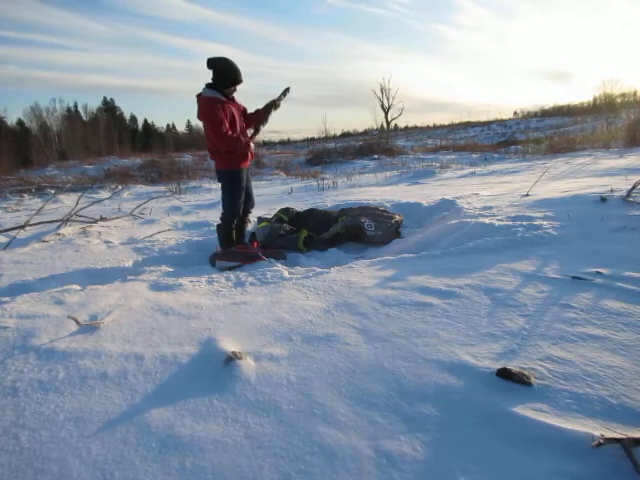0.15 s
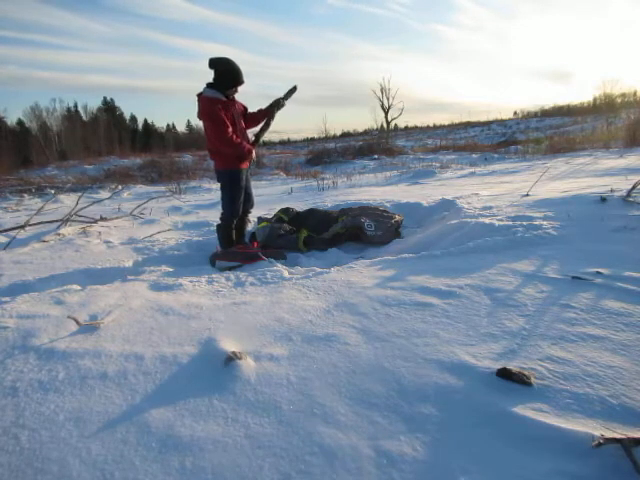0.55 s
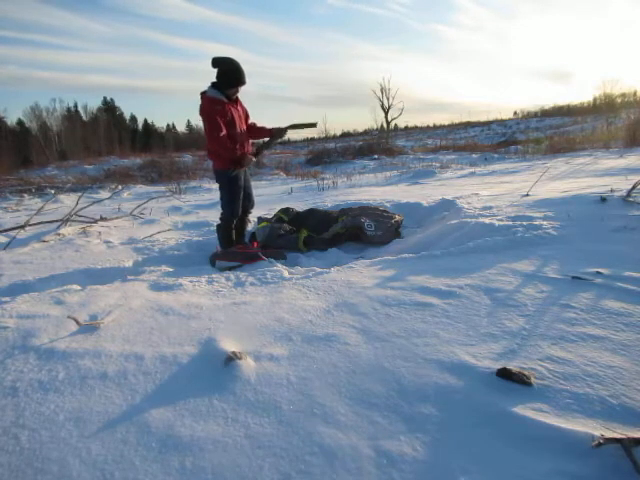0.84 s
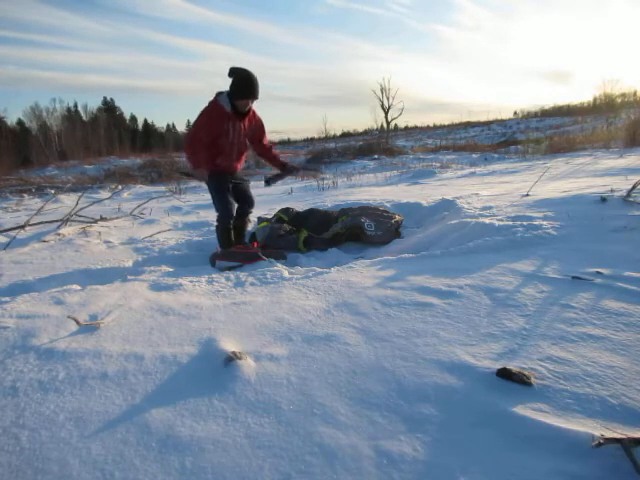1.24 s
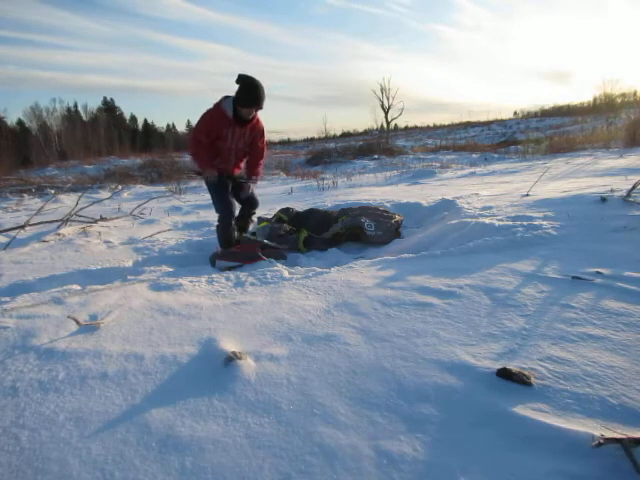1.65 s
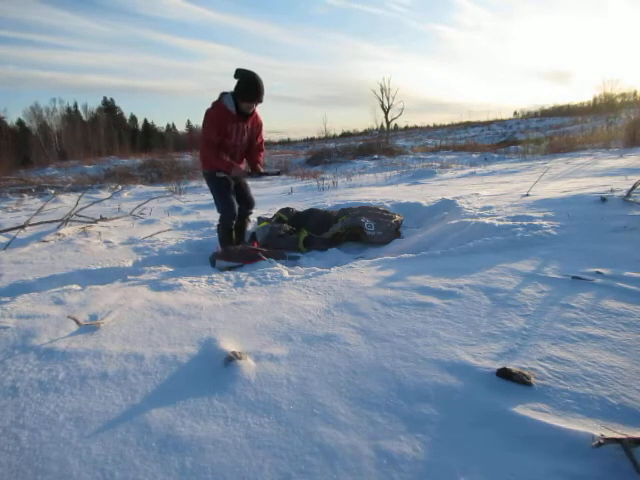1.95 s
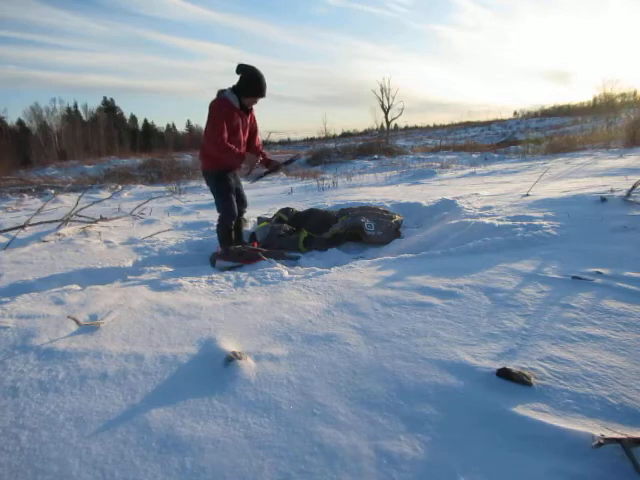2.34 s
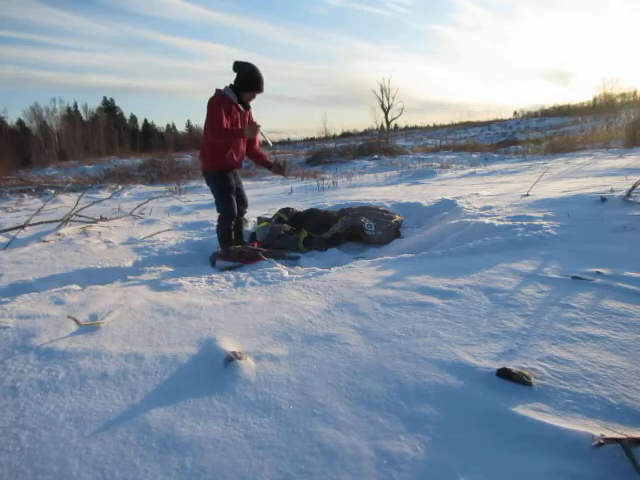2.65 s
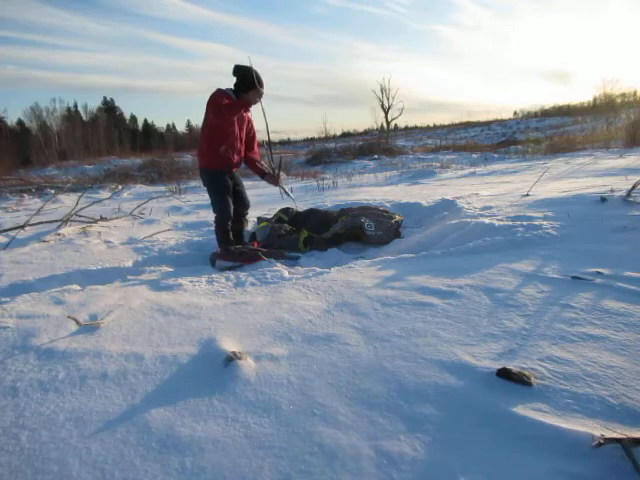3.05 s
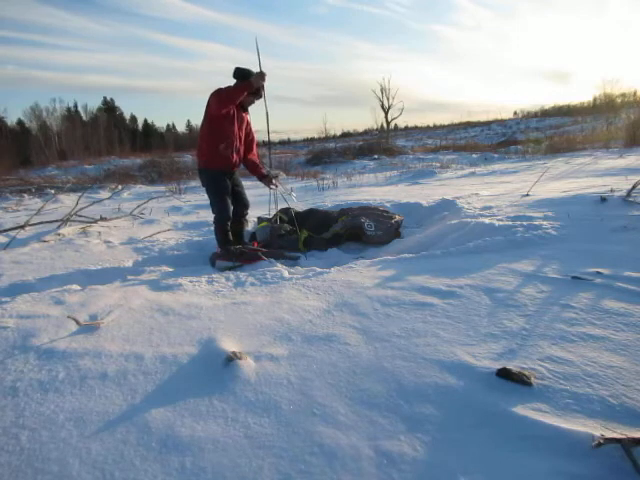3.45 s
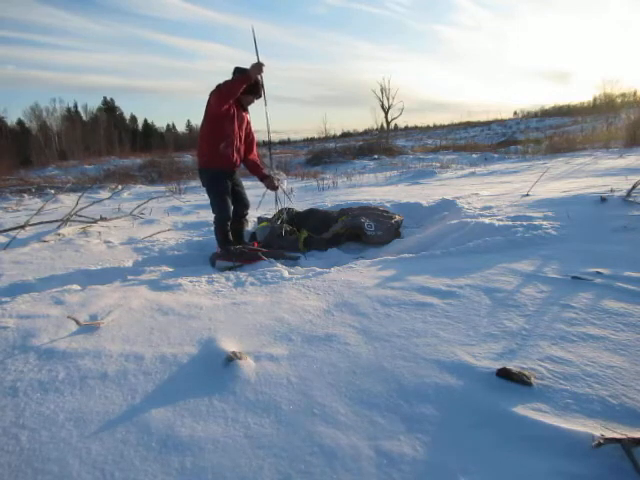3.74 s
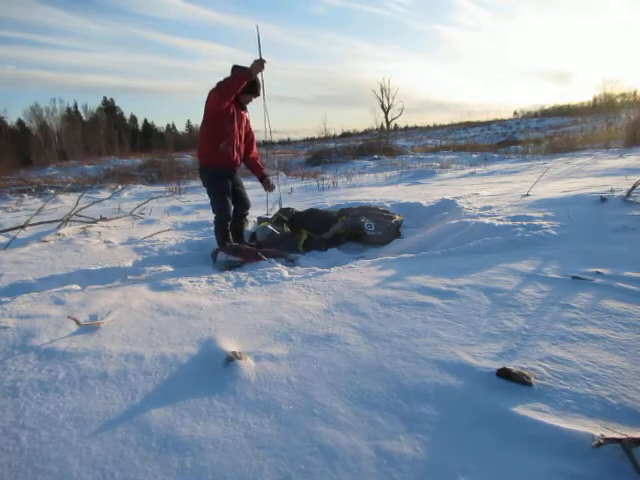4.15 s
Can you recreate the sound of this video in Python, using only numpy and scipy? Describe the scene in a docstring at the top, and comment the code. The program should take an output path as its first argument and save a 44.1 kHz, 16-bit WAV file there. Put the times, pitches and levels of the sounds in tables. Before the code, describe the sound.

A dry, close-detailed handling sound in an open snowfield, with no echo, over soft steady microphone hiss and a very faint wavering far drone. From 0 to 0.8 s thin aluminium tubes chatter in bright, short clinks with a dense cluster around 0.3 s, duller woody-metal knocks around 0.55 s, and nylon rustle; a gritty scrape climbs in pitch up to 0.75 s as the bundle leaves the bag, then stops abruptly. About 0.85 to 1.3 s is nearly quiet. Soft bumps and cloth near 1.5 s lead to a quick rattle at 1.65-1.72 s, and a single clink at 1.9 s. A crisp click lands at 2.15 s, with light ticks and glove rubbing until 2.6 s. A strong bright clatter bursts at 2.95-3.07 s. Clinks at 3.4 and 3.6 s precede low hollow knocks from 3.7 s and the loudest, very sharp snap at 3.8 s. Small ticks and rustle fade out afterwards.

```python
"""Tent poles on open snow

An open snowfield without echo, some metres from a camera: aluminium pole sections slide out of a nylon bag.
Thin tubes chatter in bright, short clinks (damped wall modes); some blows bend a section (lower modes).
Nylon and gloves rustle as shaped noise and tiny slips; the bag's hollow rings upward as the bundle leaves.
Soft bumps are low damped sines; filtered noise makes the camera's own hiss and a faint far drone."""
import sys
import numpy as np
from scipy import signal
from scipy.fft import rfft, irfft, next_fast_len
from scipy.io import wavfile
from scipy.ndimage import uniform_filter1d, minimum_filter1d, map_coordinates

SR = 44100
rng = np.random.default_rng(int(sys.argv[2]) if len(sys.argv) > 2 else 0)


def unload_wav(signal):
    """Save mono or channel-first audio to the path in sys.argv[1] as 16-bit WAV at rate SR, clipped to [-1, 1]."""
    wavfile.write(
        sys.argv[1],
        SR,
        np.round(np.clip(np.atleast_2d(signal).T, -1, 1) * 32767).astype(np.int16),
    )


N = 190159
T = np.arange(N) / SR  # s

# spectrum of the camera hiss: [f/Hz, relative density/dB]
HISS_SPECTRUM = [(15, -27), (45, 0), (495, -1.5), (684, 0.5), (848, -2.5), (945, -0.5), (2300, -9),
                 (3000, -7), (4040, -10), (10600, -14), (15500, -26)]
# noise bands of the far drone: [f/Hz, width/Hz, relative level/dB]
DRONE_BANDS = [(146, 78, 5.5), (756, 80, -5), (964, 36, 12), (1874, 380, 3.5), (2910, 27, -1)]
# soft low bumps: [t/s, level before the soft start/dB, f/Hz]
SOFT_BUMPS = [(1.488, -38, 165), (1.542, -34, 189), (2.115, -37.5, 160), (2.426, -35.5, 165),
              (2.702, -38, 151), (2.777, -42.5, 162), (2.946, -31, 127), (3.037, -42, 149),
              (3.694, -34, 220), (3.778, -28.5, 135), (3.869, -40, 129)]
# spectra of bag cloth, of tubes through a glove, of sleeves: [f/Hz, relative density/dB]
SCRAPE_SPECTRUM = [(100, -60), (300, -1.5), (900, -3.5), (1900, 0.5), (2800, -6), (5000, -33), (16000, -17)]
SLIDE_SPECTRUM = [(1200, -24.5), (2300, -4), (3300, -2.5), (4800, -7), (7000, -12.5), (16000, -21.5)]
FIZZ_SPECTRUM = [(2000, -78), (4500, -5.5), (6500, 2.5), (9000, -0.5), (12000, -1), (16000, -8.5)]
# movements of hands and bag:
# [peak t/s, swell/s, fade/s, bag scrape level/dB, tube slide level/dB, sleeve fizz level/dB]
MOVEMENTS = [(0.0, .05, .15, -45.5, -48, -51), (.118, 0.071, 0.067, -46.5, -51.5, -52.5),
             (.297, 0.026, .06, -41.5, -45, -35), (.385, 0.095, .25, -54, -54.5, -54),
             (.55, .15, 0.26, -46, -56.5, -51), (.75, .2, .05, -39, -40, -42),
             (.805, .06, .06, -41, -41, -42.5), (1.34, 0.28, 0.21, -63, -60.5, -67),
             (1.557, .06, 0.065, -44, -51, -55), (1.68, .06, 0.13, -51, -48.5, -42),
             (1.83, .2, .06, -64, -52.5, -50), (2.15, .05, 0.026, -64, -54.5, -46.5),
             (2.39, .04, 0.03, -78, -44, -44), (2.448, .03, .08, -67, -47, -56),
             (2.54, .09, 0.059, -67, -47, -49.5), (2.861, .25, 0.22, -79, -46.5, -53),
             (2.975, .04, .04, -51, -37.5, -29.5), (3.03, .06, 0.11, -72, -53, -50),
             (3.43, 0.054, .2, -70, -55.5, -50), (3.586, 0.095, 0.24, -81, -47.5, -64),
             (3.77, .1, .06, -51, -47, -48), (3.82, .03, .15, -50, -45.5, -44),
             (3.995, .08, 0.053, -47, -49.5, -43), (4.117, 0.18, 0.095, -51.5, -56.5, -55.5),
             (4.31, .4, 0.053, -60.5, -61.5, -78)]
# cloth between movements: [scrape level/dB, slide level/dB, fizz level/dB]
IDLE_LEVELS = [-68, -66, -64.5]
# the bundle is drawn out of the bag: [peak t/s, swell/s, fade/s, level/dB]
BAG_PULLS = [(.755, 0.19, 0.034, -38)]
# blows that bend a section: [t/s, level/dB, high over low modes/dB, middle modes over both ends/dB]
BENDING_BLOWS = [(.016, -31.5, 28, -2), (.293, -28, 26, 6), (0.453, -34.5, 4, 10), (0.536, -22, 4, 11),
                 (0.574, -29, 14, 8), (.587, -29, 26, 10), (0.639, -37, 21, 5), (0.674, -30, 28, 9),
                 (.738, -30, 35, 0), (1.052, -38.5, 15, -14), (1.294, -38.5, 16, 9), (1.352, -40, 4, 8),
                 (1.491, -27, 3, 3), (1.498, -28.5, -4, 7), (1.54, -35.5, -15, -1), (1.627, -35, 41, 3),
                 (2.948, -26.5, -15, 4), (3.4, -33.5, 9, 10), (3.699, -19.5, -5, -2), (3.757, -25, -21, 0),
                 (3.765, -19, -1, 17.5), (3.786, -29, -9, -3), (3.825, -36, 0, 10), (3.871, -32.5, -10, 18),
                 (3.992, -32.5, -8, 11), (4.064, -35, -14, 14), (4.104, -36, -5, 13)]
# bending modes of a section, nominal: [f/Hz, level/dB, t60/s]
BENDING_MODES = [(420, -3, 0.019), (691, -3.5, 0.012), (887, -7, 0.033), (1230, 2.5, 0.0032),
                 (1630, 1, 0.019), (2054, 4.5, 0.012), (2490, 15, 0.0036), (2780, 14.5, 0.0027)]
# clear clinks, tube on tube: [t/s, level/dB, high over low wall modes/dB, chatter t60/s]
TUBE_CLINKS = [(0.013, -32, -3, 0.011), (0.0367, -24, -18, 0.026), (.0803, -35.5, -31, .013),
               (0.1108, -31, -14, 0.051), (0.1314, -36, -30, .016), (0.283, -32, -2, .05),
               (0.2943, -25.5, -11, 0.049), (0.2993, -17.5, 0, 0.018), (.3197, -25.5, -5, 0.015),
               (.3265, -28, -5, .02), (0.341, -35, 1, 0.031), (0.3505, -35, -23, .032),
               (0.3697, -31.5, -11, 0.03), (.3793, -29, -6, 0.023), (.3887, -34, -10, 0.021),
               (.498, -29, -8, 0.0081), (.5445, -27, -4, 0.011), (.5874, -33.5, -25, 0.0057),
               (0.6418, -30, -3, .004), (.7093, -33, 11, .046), (.724, -30, 2, .011),
               (0.753, -22.5, -20, 0.0036), (.7628, -21, -34, .007), (.801, -30, -1, 0.022),
               (1.3413, -38, 3, .009), (1.492, -38, -33, 0.0059), (1.5416, -34.5, -25, .015),
               (1.646, -24.5, -7, 0.057), (1.654, -23, -6, 0.033), (1.666, -26, -25, .008),
               (1.6771, -30, 12, .01), (1.6812, -20.5, -34, 0.0089), (1.6969, -25, -9, 0.012),
               (1.705, -25.5, 14, 0.018), (1.7193, -24.5, -8, 0.013), (1.839, -39, -5, 0.035),
               (1.8968, -25.5, -11.5, 0.03), (2.1479, -16, 3, 0.012), (2.1646, -29.5, -10, 0.013),
               (2.194, -43, -1, .03), (2.28, -42.5, -24, 0.068), (2.3671, -29.5, -14, 0.036),
               (2.3857, -44, -15, 0.091), (2.4122, -41, -3, .03), (2.4363, -34.5, -2, .05),
               (2.448, -37, -17, 0.031), (2.469, -42, -5, .02), (2.4771, -40, -20, .035),
               (2.5435, -29, -12, 0.021), (2.5562, -29, -17, 0.016), (2.8102, -37, -16, 0.043),
               (2.849, -31, -27, 0.047), (2.8634, -31, -20, 0.064), (2.8916, -33, -11, 0.052),
               (2.909, -19, 2, .024), (2.9493, -33, 3, .05), (2.9596, -12, -6, 0.025),
               (2.9655, -15, 0, 0.057), (2.9775, -13.5, 22, .013), (2.9809, -4.5, 18, .025),
               (3.0208, -23, -1, 0.034), (3.0383, -25, -5, 0.0077), (3.0545, -15, 0, 0.032),
               (3.0674, -24, 10, .009), (3.084, -31.5, -5, .021), (3.1017, -37, 7, 0.035),
               (3.3255, -40.5, -25, 0.098), (3.4007, -23.5, -19, 0.077), (3.4052, -18, -9, 0.031),
               (3.482, -38, -24, 0.036), (3.495, -27.5, -34, 0.0088), (3.528, -42, -43, .03),
               (3.5696, -23.5, -27, 0.046), (3.587, -36, -28, .012), (3.5936, -28.5, -54, 0.011),
               (3.628, -30, -13, 0.06), (3.6664, -29, -14, 0.045), (3.7, -34.5, -27, 0.094),
               (3.739, -28, -36, .009), (3.7649, -28.5, -30, 0.074), (3.7969, 14, 37, 0.0083),
               (3.7982, -3, 33.5, 0.025), (3.8141, -41, 0.5, 0.035), (3.8242, -24, -7, .041),
               (3.8444, -36, 7, .04), (3.879, -37, -32, 0.022), (3.894, -43, 10, .035),
               (3.972, -29, -10, 0.092), (3.984, -25, 9, 0.054), (4.0353, -28, -26, .026),
               (4.118, -37, -20, 0.056), (4.173, -52, -24, .018)]
# wall modes of a tube damped by hands and cord, nominal: [f/Hz, level/dB, t60/s]
WALL_MODES = [(3010, -22.5, 0.016), (3580, -20, 0.031), (4590, -2.5, 0.0031), (4960, -5, 0.0087),
              (5660, -0.5, 0.0024), (6480, -7, 0.01), (7260, -2, 0.0023), (7560, -15, 0.0026),
              (8320, 9, 0.0018), (9350, 5, 0.0042), (9830, 6.5, 0.0033), (11020, 10, 0.0019),
              (11600, -11, 0.0021), (12000, -1, 0.0094), (14300, 3, 0.0016), (14100, -8, 0.0035),
              (14950, -21, 0.0019), (17300, -4.5, 0.0025)]

HISS_DB, DRONE_DB, DRONE_WAVER_DB = -56.5, -63.5, 2.5
BUMP_T60 = 0.034  # s
SPAN_DB = 20  # swell and fade are the times for this change of level
JOLT_SWELL_S, JOLT_FADE_S = 0.006, 0.02  # a blow shakes loose a brief rustle
KNOCK_JOLT_DB = -22  # scrape, relative to the knock
CLINK_JOLT_DB = (-28.5, -22.5)  # slide and fizz, relative to the clink
JOLT_TOP_DB = -8.5  # no clink shakes harder than one of this level
HOLLOW_HZ, HOLLOW_RISE, HOLLOW_WIDTH = 3100, 9.8, 0.4  # pitch at the peak; octaves per s; octaves
KNOCK_T60 = 0.021  # chatter of a knock, s
WALL_SPOT_DB, BENDING_SPOT_DB = 3, 2  # random spread of mode strengths with the spot hit
WALL_ENDS_DB = -5.5  # lowest and highest wall modes relative to the middle ones
TICK_COUNT, TICK_DB, TICK_SCATTER_DB = 40, -44, 5.5
TICK_BRIGHT_DB, TICK_BRIGHT_SCATTER_DB, TICK_T60 = -20, 15, 0.012  # t60 in s
SHELF_HZ, TOP_HZ = 15150, 16381


def amp(db):
    """Gain of a level in dB."""
    return 10 ** (np.asarray(db) / 20)


def unit(x):
    """x at rms 1."""
    return x / np.sqrt(np.mean(x ** 2) + 1e-20)


def along(points, hz):
    """Values at hz, interpolated between (Hz, value) points on a log axis."""
    f, value = np.transpose(points)
    return np.interp(np.log(hz + 1), np.log(f + 1), value)


def filtered(x, response):
    """x with its spectrum multiplied by a response of frequency."""
    length = next_fast_len(N + SR // 4)
    hz = np.fft.rfftfreq(length, 1 / SR)
    return irfft(rfft(x, length) * response(hz), length)[:N]


def wobble(rate):
    """A smooth random curve with rate knots a second."""
    knots = rng.standard_normal(int(N * rate / SR) + 4)
    return map_coordinates(knots, [T * rate])


def add(track, s, sound):
    """Lays a sound on the track at s seconds."""
    part = track[max(round(s * SR), 0):][:len(sound)]
    part += sound[:len(part)]


def swells(rows):
    """Power over time of (peak s, swell s, fade s, dB, ..) rows, one curve for each level column."""
    s, swell, fade, *levels = np.transpose(rows)[:, :, None]
    t = T[::32]  # a coarse time grid is enough
    shape = amp(-2 * SPAN_DB * np.maximum((s - t) / swell, (t - s) / fade))
    curves = [np.sum(amp(2 * level) * shape, axis=0) for level in levels]
    return np.array([np.interp(T, t, curve) for curve in curves])


def thin(x, hz):
    """A thin tube cannot move air below its lowest mode: a steep high-pass."""
    return signal.sosfilt(signal.butter(4, hz, "high", fs=SR, output="sos"), x)


def stillness():
    """Camera hiss and air, with a faint far drone of narrow, wavering noise bands."""
    def drone_response(f):
        return sum(amp(db) * 1j * f * width / (centre * centre - f * f + 1j * f * width)
                   for centre, width, db in DRONE_BANDS)

    hiss = filtered(rng.standard_normal(N), lambda hz: amp(along(HISS_SPECTRUM, hz)))
    drone = filtered(rng.standard_normal(N), drone_response)
    drone_level = amp(DRONE_DB + DRONE_WAVER_DB * wobble(4.96))
    return amp(HISS_DB) * unit(hiss) + drone_level * unit(drone)


def bumps():
    """Each bump is one low, damped swing with a soft start."""
    out = np.zeros(N)
    t = np.arange(SR // 6) / SR
    soft_start = 1 - np.exp(-t / 0.0026)
    for s, db, hz in SOFT_BUMPS:
        decay = amp(db - 60 * t / BUMP_T60)
        add(out, s, decay * soft_start * np.sin(2 * np.pi * hz * t))
    return out


def rubbing(spectrum, slips, lumpy_db, smooth):
    """Cloth slips in tiny uneven jerks (slips a second) that come in clumps, over a smooth share of noise."""
    size = amp(6.6 * rng.uniform(-1.23, 1, N)) * np.sign(rng.standard_normal(N))
    jerks = size * (rng.random(N) < slips / SR)
    friction = unit(jerks) + smooth * rng.standard_normal(N)
    clumps = amp(lumpy_db * (wobble(35) + wobble(140)))
    return unit(filtered(friction * clumps, lambda hz: amp(along(spectrum, hz))))


def rustle():
    """One uneven rubbing for each material, driven by movements and jolted by knocks and the louder clinks."""
    knock_jolts = [(s, JOLT_SWELL_S, JOLT_FADE_S, db + KNOCK_JOLT_DB) for s, db, *_ in BENDING_BLOWS]
    clink_jolts = [(s, JOLT_SWELL_S, JOLT_FADE_S, *(min(db, JOLT_TOP_DB) + np.array(CLINK_JOLT_DB)))
                   for s, db, *_ in TUBE_CLINKS if db > -30]
    power = swells(MOVEMENTS) + amp(2 * np.array(IDLE_LEVELS))[:, None]
    power[:1] += swells(knock_jolts)  # scrape
    power[1:] += swells(clink_jolts)  # slide and fizz
    scrape, slide, fizz = np.sqrt(power)
    return (scrape * rubbing(SCRAPE_SPECTRUM, slips=2500, lumpy_db=2.2, smooth=0.26)
            + slide * rubbing(SLIDE_SPECTRUM, slips=3000, lumpy_db=1.98, smooth=0.77)
            + fizz * rubbing(FIZZ_SPECTRUM, slips=3000, lumpy_db=2.0, smooth=0.65))


def pull():
    """A gritty scrape rings in the hollow of the bag, whose pitch climbs as the tubes leave."""
    scrape = rubbing(SCRAPE_SPECTRUM, slips=1300, lumpy_db=1.4, smooth=0.45)
    hz, t, spectra = signal.stft(scrape, SR, nperseg=256)
    # the pitch, in octaves, climbs during the last 0.15 s before the peak
    centre = np.log2(HOLLOW_HZ) + HOLLOW_RISE * np.clip(t - BAG_PULLS[0][0], -0.15, 0)
    distance = (np.log2(hz + 1)[:, None] - centre) / HOLLOW_WIDTH
    ring = 1 / np.sqrt(1 + distance ** 4)
    hollow = signal.istft(spectra * ring, SR, nperseg=256)[1][:N]
    return np.sqrt(swells(BAG_PULLS)[0]) * unit(hollow)


def blow(modes, colour_db, t60, spot_db, contacts, swell, first):
    """Tiny contacts swell and die away, ringing modes whose strength and pitch vary with each blow."""
    t = np.arange(SR // 12) / SR
    hz, db, ring = np.transpose(modes)[:, :, None]
    strength, detune = rng.standard_normal((2, len(modes), 1))
    decay = amp(db + colour_db[:, None] + spot_db * strength - 60 * t / ring)
    decay[::2] *= -1  # neighbouring modes start in opposite directions
    tone = np.sum(decay * np.sin(2 * np.pi * hz * (1 + 0.029 * detune) * t), axis=0)
    taps = rng.standard_normal(len(t)) * (rng.random(len(t)) < contacts / SR)  # contacts a second
    taps *= amp(-60 * t / t60) * (1 - np.exp(-t / (swell * t60)))
    taps[0] = first  # the blow itself, before the chatter
    sound = signal.fftconvolve(taps, tone)[:len(t)]
    loudest = np.sqrt(uniform_filter1d(sound ** 2, size=66).max())
    return sound / (2 * loudest)  # peaks near 1


def knocks():
    """A blow bends a section; the grip damps some bending modes and leaves others free."""
    out = np.zeros(N)
    hz = np.array(BENDING_MODES)[:, 0]
    for s, db, bright_db, middle_db in BENDING_BLOWS:
        colour = along([(450, -bright_db / 2), (1050, middle_db), (1900, bright_db / 2)], hz)
        sound = blow(BENDING_MODES, colour, KNOCK_T60, BENDING_SPOT_DB, contacts=1300, swell=0.026, first=1.56)
        add(out, s, amp(db) * sound)
    return thin(out, hz=248)


def ticks():
    """Rows of faint extra clinks, at random moments that crowd where the tubes slide."""
    busy = np.cumsum(swells(MOVEMENTS)[1] ** 0.16)
    when, size, tone = rng.random((TICK_COUNT, 3)).T
    share = (np.arange(TICK_COUNT) + when) / TICK_COUNT
    s = np.interp(share, busy / busy[-1], T)
    db = TICK_DB + TICK_SCATTER_DB * (2 * size - 1)
    bright_db = TICK_BRIGHT_DB + TICK_BRIGHT_SCATTER_DB * (2 * tone - 1)
    return [(*row, TICK_T60) for row in zip(s, db, bright_db)]


def clinks():
    """Tube strikes tube; where the two touch tilts the wall modes from low to high."""
    out = np.zeros(N)
    hz = np.array(WALL_MODES)[:, 0]
    for s, db, bright_db, t60 in TUBE_CLINKS + ticks():
        low_db, high_db = WALL_ENDS_DB - bright_db / 2, WALL_ENDS_DB + bright_db / 2
        colour = along([(3300, low_db), (7000, 0), (11500, high_db)], hz)
        sound = blow(WALL_MODES, colour, t60, WALL_SPOT_DB, contacts=4300, swell=0.0055, first=1.74)
        add(out, s, amp(db) * sound)
    return thin(out, hz=2420)


def scene():
    """All layers add up dry: open snow gives back no echo."""
    return (clinks() + knocks() + bumps() + rustle() + pull() + stillness())[None]


def record(dry):
    """A fast limiter holds peaks just above full scale; the top treble drops in a step, then ends."""
    def treble(hz):
        step_db = np.clip((SHELF_HZ - hz) / 8, -30, 0)
        slope_db = np.clip(hz - SHELF_HZ, 0, None) / 70
        return amp(step_db - slope_db) * (hz < TOP_HZ)

    needed = 1 / np.maximum(np.abs(dry[0]) / 1.1, 1)
    gain = uniform_filter1d(minimum_filter1d(needed, size=61), size=61)
    return filtered(dry[0] * gain, treble)[None]


dry = scene()
out = record(dry)
unload_wav(out)
```